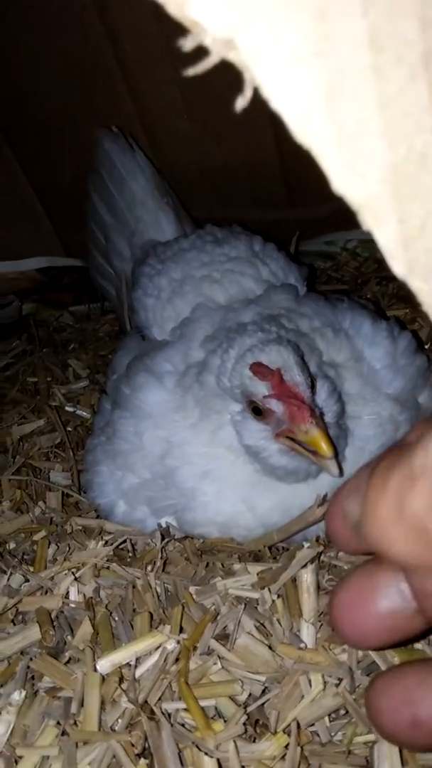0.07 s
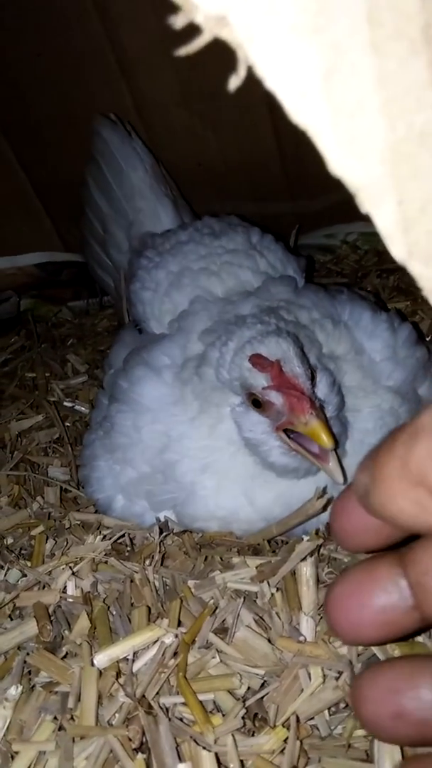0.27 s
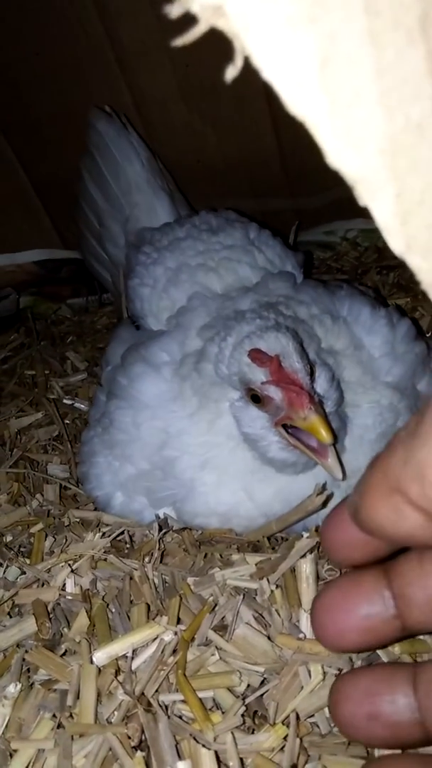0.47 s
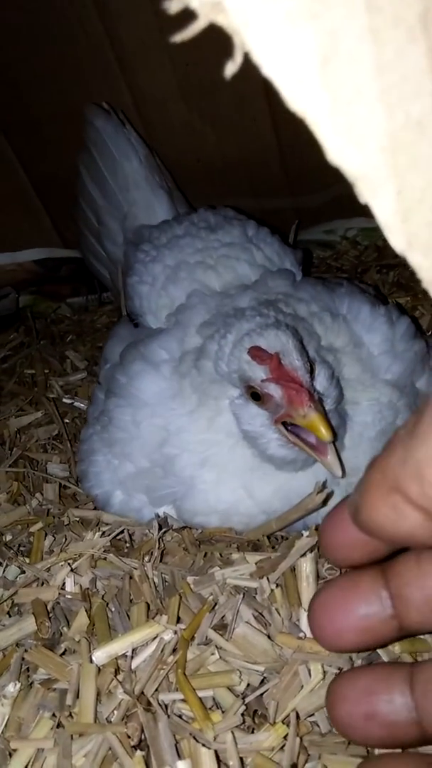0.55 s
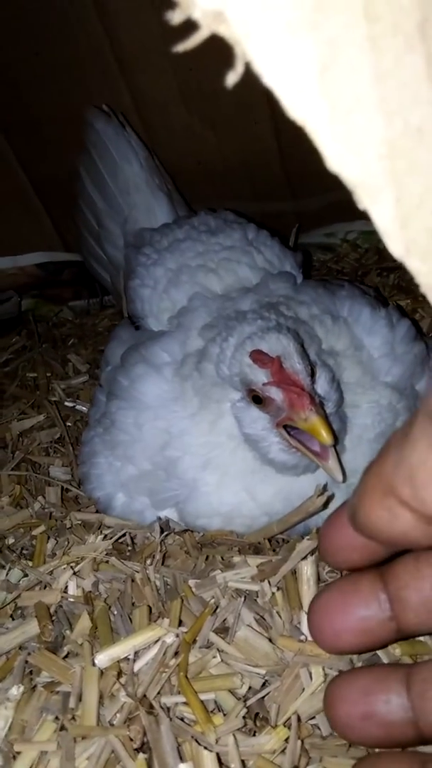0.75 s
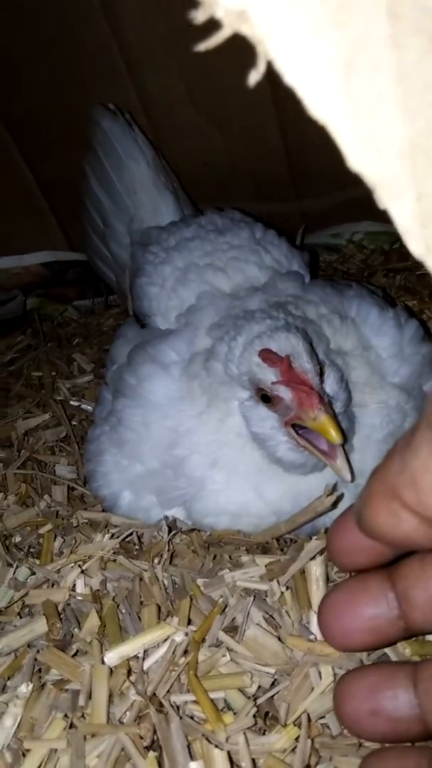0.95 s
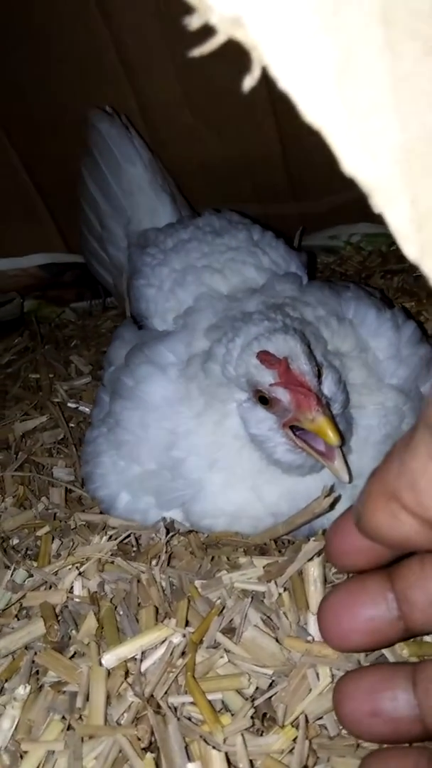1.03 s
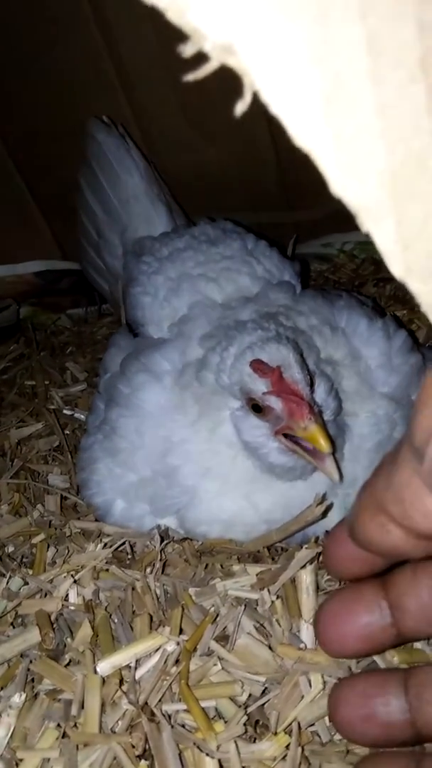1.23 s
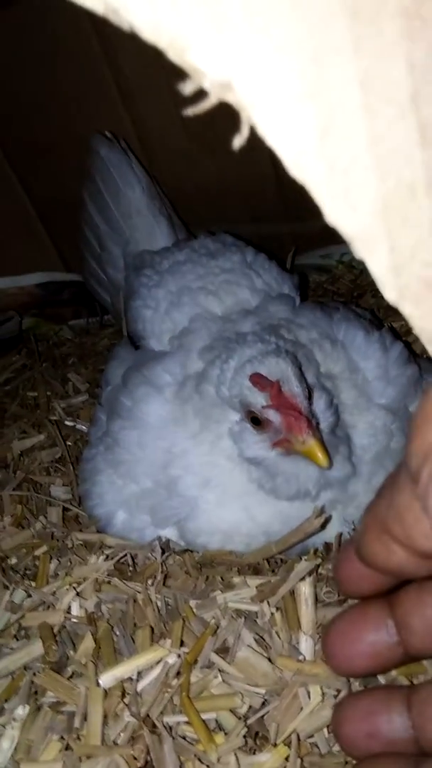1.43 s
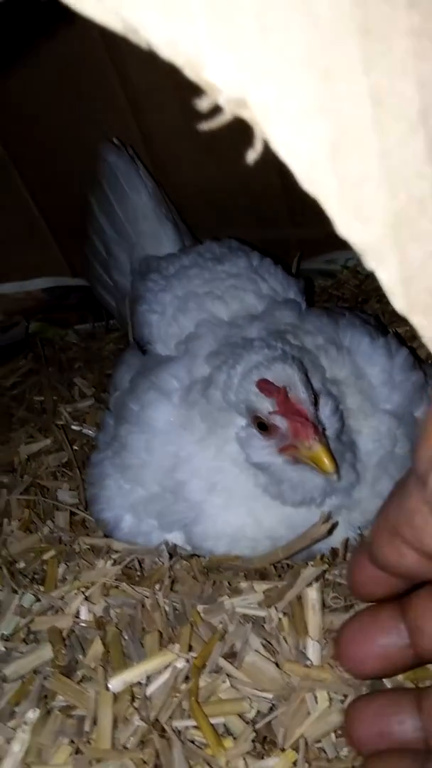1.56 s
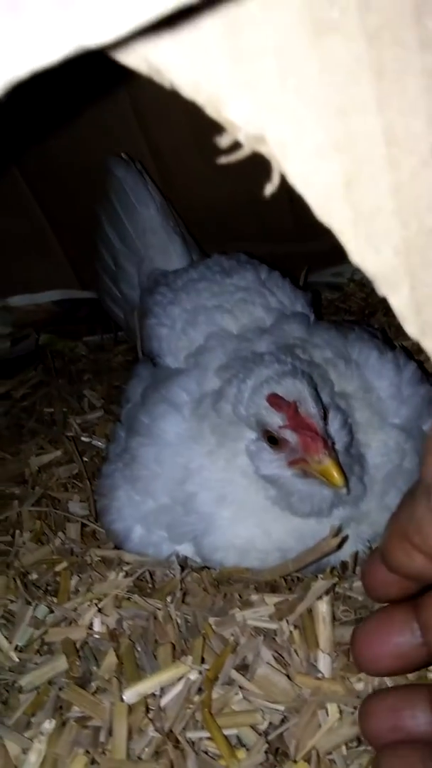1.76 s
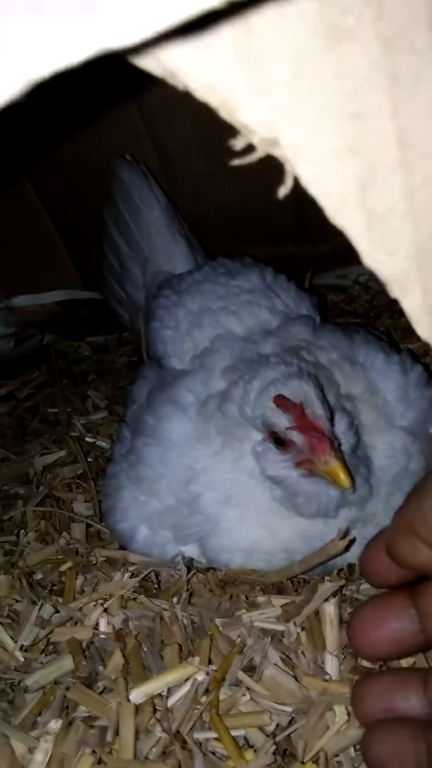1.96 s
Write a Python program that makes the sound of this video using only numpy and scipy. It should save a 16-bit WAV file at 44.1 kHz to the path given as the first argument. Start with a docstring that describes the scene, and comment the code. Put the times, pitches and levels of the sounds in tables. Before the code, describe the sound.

A broody hen gives one long harsh raspy growl, stuttering at first and dropping in pitch at the end

```python
"""A hen on a straw nest in a cardboard box gives one long warning growl, close by.
It starts as a stutter of pulses from the syrinx, over a hiss of shaped noise and a thin whistle.
The syllables fuse into a harsh rasp of uneven pulses and noise puffs, full of tiny gliding tones.
The rasp then clears and falls in pitch as the beak closes, cracking into half-order partials.
Straw stirs faintly afterwards, as crackles and thuds of filtered noise over a quiet background."""
import sys
import numpy as np
from scipy import signal
from scipy.fft import rfft, irfft
from scipy.io import wavfile

SR = 44100
rng = np.random.default_rng(int(sys.argv[2]) if len(sys.argv) > 2 else 0)


def master(y):
    """Save y as 16-bit WAV."""
    cut = np.clip(np.atleast_2d(y).T, -1, 1)
    pcm = np.round(cut * 32767)  # scale
    wavfile.write(sys.argv[1], SR, pcm.astype(np.int16))


N = 88200
T = np.arange(N) / SR  # time [s]
HZ = np.fft.rfftfreq(2 * N, 1 / SR)  # frequencies of the zero-padded spectrum [Hz]


def amp(db):
    """Level law: decibels to amplitude gain."""
    return 10 ** (np.asarray(db) / 20)


def unit(x):
    """Normalisation to an rms of 1."""
    return x / np.sqrt(np.mean(x ** 2) + 1e-20)


def curve(rows, axis=1):
    """Linear interpolation of one column of a time table at every sample."""
    rows = np.array(rows, float)
    return np.interp(T, rows[:, 0], rows[:, axis])


def at_hz(rows, hz):
    """Interpolation of a spectrum table on a log-frequency axis."""
    table_hz, value = np.transpose(rows)
    return np.interp(np.log(hz + 1), np.log(table_hz), value)


def filtered(x, gain):
    """Linear filtering: multiplication by a frequency response."""
    return irfft(rfft(x, 2 * N) * gain)[:N]


def coloured(x, rows):
    """Minimum-phase filtering: the phase follows from the log gain; output rms 1."""
    log_gain = np.log(amp(at_hz(rows, HZ)))
    circle = np.concatenate([log_gain, log_gain[-2:0:-1]])
    response = np.exp(np.conj(signal.hilbert(circle)))[:N + 1]
    return unit(filtered(x, response))


def wobble(rate_hz):
    """Low-passed random motion with a Gaussian spectrum, rms 1."""
    return unit(filtered(rng.standard_normal(N), np.exp(-(HZ / rate_hz) ** 2)))


# pitch of the voice before sag and jitter: (time [s], frequency [Hz])
PITCH = [(0, 496.7), (.18, 504.8), (.4, 550.1), (1.2, 551.8), (1.33, 517), (1.42, 497.4), (1.47, 466.9),
         (1.51, 463.3), (1.57, 420)]
# harshness of the voice: (time [s], roughness [0-1])
ROUGHNESS = [(0, .5), (.9, .72), (1.28, 0.61), (1.34, .34), (1.415, 0.3), (1.445, 0.2), (1.51, 0.24),
             (1.55, 0.42)]
# at first the membranes close twice a cycle, so odd harmonics are weak: (time [s], strength [0-1])
ODD_STRENGTH = [(0, 0), (.6, 0.25), (1.36, 0.99)]
SYLLABLE_SAG = .08  # largest fall of pitch, as a fraction
JITTER, SHIMMER, WANDER_HZ = .14, .15, 424  # pitch and log-level unsteadiness at full roughness
RASP_HZ, RASP_DB = 88.1, 1.47  # random level flutter at full roughness
PUFF_SHARE, PUFF_CYCLES, PUFF_ABOVE_HZ = 1, 1., 210  # power share at full roughness, decay, high-pass
# as the rasp clears, the squeal locks onto the fourth harmonic
LOCK_S, LOCK_LENGTH_S, LOCK_GAIN = 1.376, 0.05, 0.77


def syrinx():
    """Self-oscillation: uneven membrane pulses, each with a puff of turbulent air."""
    rough = np.clip(curve(ROUGHNESS), 0, 1)
    # the pitch sags in every syllable
    sag = SYLLABLE_SAG * opening() * np.clip(1 - (T / FUSED_S) ** 2, 0, 1)
    hz = curve(PITCH) * (1 - sag)
    turns = np.cumsum(hz * (1 + JITTER * rough * wobble(WANDER_HZ))) / SR

    orders = np.arange(1, 30)
    harmonics = np.cos(2 * np.pi * orders[:, None] * turns)
    even = unit(harmonics[1::2].sum(0))
    odd = unit(harmonics[::2].sum(0))
    pulses = (even + curve(ODD_STRENGTH) * odd) / np.hypot(1, curve(ODD_STRENGTH))
    lock_swell = np.exp(-.5 * ((T - LOCK_S) / LOCK_LENGTH_S) ** 2)
    locked = LOCK_GAIN * lock_swell * harmonics[3]
    pulses = (pulses + locked) * np.exp(SHIMMER * rough * wobble(WANDER_HZ))

    turbulence = filtered(rng.standard_normal(N), HZ / np.hypot(HZ, PUFF_ABOVE_HZ))
    puffs = np.exp(-(turns % 1) / PUFF_CYCLES) * turbulence
    share = np.clip(PUFF_SHARE * rough ** 2, 0, 1)
    strength = amp(RASP_DB * rough * wobble(RASP_HZ))
    return (np.sqrt(1 - share) * unit(pulses) + np.sqrt(share) * unit(puffs)) * strength


# opening syllables: middle [s]
SYLLABLES = [.022, .074, .126, .177, .227, .276, .319, .361, .404]
SYLLABLE_S, EDGE_S, FUSED_S = .021, 0.0098, .435  # syllable length, half-width of an edge, fusion


def opening():
    """Valve action: the syrinx opens once per syllable, then stays open (0-1)."""
    inside = np.max([SYLLABLE_S / 2 - abs(T - s) for s in SYLLABLES] + [T - FUSED_S], axis=0)
    return .5 + .5 * np.sin(np.pi / 2 * np.clip(inside / EDGE_S, -1, 1))


GAP_DB, GAP_RISE_DB_PER_S = -33, 61.5
END_S, RELEASE_S = 1.57, .07


def airflow():
    """Amplitude modulation: gaps leak more and more; the call ends in a short release."""
    leak = amp(np.minimum(GAP_DB + GAP_RISE_DB_PER_S * T, 0))
    release = np.clip(1 - (T - END_S) / RELEASE_S, 0, 1)
    return np.maximum(opening(), leak) * release


SMEAR_S, SMEAR_WIDTH_HZ = 0.001, 260  # spread of the delays, spacing in frequency


def smeared(x):
    """Dispersion: reflections off close walls delay each frequency slightly differently."""
    delays = SMEAR_S * rng.standard_normal(200)
    delay = np.interp(HZ, np.arange(len(delays)) * SMEAR_WIDTH_HZ, delays)
    # phase is the running sum of group delay
    return filtered(x, np.exp(-2j * np.pi * np.cumsum(delay) * HZ[1]))


# colour of throat, beak and nest: (frequency [Hz], relative level [dB])
THROAT = [(200, -63), (360, -42.5), (460, -29), (760, -20.5), (930, -6), (1020, -13.5), (1110, -3.5),
          (1300, -17.5), (1440, -10), (1850, -15), (2020, -8), (2150, -12), (2300, -2), (2530, 1),
          (2820, -7.5), (3000, -1), (3370, -15), (3480, -6.5), (3700, -4.5), (4050, -18), (4420, -9),
          (4580, -18.5), (4800, -8), (5000, -25), (5320, -17), (5700, -30), (6300, -33), (7800, -52),
          (9400, -51.5), (10400, -73.5), (11400, -57), (12300, -69)]
# crossovers between the four voice bands: frequency [Hz]
BAND_EDGES_HZ = [701, 2060, 3326]
# constant offset of each voice band: level [dB]
BAND_TRIM_DB = [1.5, -1.13, -2.5, -1.25]
# voice bands before their offsets:
# (time [s], fundamental level [dB], body level [dB], ring level [dB], treble level [dB])
BAND_LEVELS = [(0, -59, -31, -37, -60), (.17, -54, -30.5, -32.5, -39.5), (.32, -58, -30.5, -20.5, -34),
               (.7, -48.5, -29.5, -20, -31), (.92, -50, -25.5, -16, -22), (1.24, -48, -23.5, -16, -20),
               (1.35, -50, -28.5, -22, -22.5), (1.425, -55, -26.5, -33.5, -29),
               (1.455, -43.5, -25.5, -40, -39.5), (1.5, -41, -27, -49, -47.5),
               (1.55, -48.5, -29.5, -65, -53.5), (1.6, -55.5, -54.5, -73.5, -75.5)]


def growl():
    """Source and filter: pulses ring the throat; four bands swell and fade with the beak."""
    voice = smeared(coloured(syrinx(), THROAT))
    crossovers = [.5 - .5 * np.tanh((HZ - edge) / 70) for edge in BAND_EDGES_HZ]
    below = [0] + crossovers + [1]
    out = np.zeros(N)
    for k, trim_db in enumerate(BAND_TRIM_DB):
        band = unit(filtered(voice, below[k + 1] - below[k]))
        level_db = curve(BAND_LEVELS, axis=k + 1)
        out += band * amp(level_db + trim_db)
    return out * airflow()


# partials between the harmonics:
# (middle [s], Gaussian length [s], multiple of the pitch [1], level [dB])
CRACKS = [(1.495, 0.0048, 2.5, -26.5), (1.479, 0.0078, 3.5, -26)]


def cracks():
    """Period doubling: the membranes briefly slip to half-order partials as the call falls."""
    turns = np.cumsum(curve(PITCH)) / SR
    out = np.zeros(N)
    for s, length, multiple, level_db in CRACKS:
        swell = np.exp(-.5 * ((T - s) / length) ** 2)
        out += np.sqrt(2) * amp(level_db) * swell * np.sin(2 * np.pi * multiple * turns)
    return out


SQUEAL_S, SQUEAL_FALL_HZ_PER_S = 0.0029, 60000  # at size 1 and steepness 1
SQUEAL_HZ, SQUEAL_JITTER = 2478, .02


def squeal(waver, s, level_db, hz=SQUEAL_HZ, size=1, steepness=1):
    """Frequency modulation: a few milliseconds of unsteady tone sliding in pitch."""
    near = abs(T - s) < .02
    t, out = T[near] - s, np.zeros(N)
    turns = hz * t - steepness * SQUEAL_FALL_HZ_PER_S * t ** 2 / 2
    turns += np.cumsum(SQUEAL_JITTER * hz * waver[near]) / SR
    swell = np.exp(-.5 * (t / (size * SQUEAL_S)) ** 2)
    out[near] = np.sqrt(2) * amp(level_db) * swell * np.sin(2 * np.pi * turns)
    return out


# distinct squeals of the second sound source in the syrinx: (middle [s], level [dB])
SQUEALS = [(.216, -23), (.263, -19.5), (.276, -19.5), (.305, -20.5), (.347, -19.5), (.365, -16),
           (.384, -18), (.409, -21), (.447, -16.5), (.464, -25.5), (.533, -17)]
# crowd of squeals: mean rate, pitch range either way, level against the ring band, end
SQUEALS_PER_S, SQUEAL_SPREAD_HZ, SQUEAL_DB, SQUEALS_END_S = 80, 70, -3.5, 1.33


def squeals():
    """Second oscillator: distinct squeals, then a random flatter crowd that follows the ring."""
    gap, loud, high, size, steep = rng.random((200, 5)).T
    times = FUSED_S + np.cumsum(.5 + gap) / SQUEALS_PER_S
    ring_db = np.interp(times, T, curve(BAND_LEVELS, axis=3))
    level_db = ring_db + SQUEAL_DB + 2 * (2 * loud - 1)
    hz = SQUEAL_HZ + SQUEAL_SPREAD_HZ * (2 * high - 1)
    # slopes of either sign, so some of the crowd rise
    crowd = zip(times, level_db, hz, .5 + 1.5 * size, .5 * (steep - .5))
    rows = list(SQUEALS) + [row for row in crowd if row[0] < SQUEALS_END_S]
    waver = wobble(WANDER_HZ)
    return sum(squeal(waver, *row) for row in rows)


# thin whistle that carries on between the syllables, before sag, swell and flutter:
# (time [s], frequency [Hz], level [dB])
WHISTLE = [(0, 1974, -50.5), (.13, 1996, -49), (.25, 2088, -51), (.29, 2960, -70), (.338, 2863, -40.5),
           (.372, 2237, -32), (.43, 2305, -31), (.52, 2220, -120)]
WHISTLE_WAVER, WHISTLE_SAG = 0.027, .05  # fractions of the pitch
WHISTLE_OPEN_DB, WHISTLE_LAG_S = 16, 0.0045  # swell that follows each opening
WHISTLE_FLUTTER_DB = 6  # with the syrinx open; twice this when shut; fades until fusion
# colour of the hiss through the open beak: (frequency [Hz], relative level [dB])
HISS = [(3300, -18.5), (4400, 3.5), (6400, 0), (6650, -28), (14000, -39.5)]
# strength of the hiss: (time [s], level [dB])
HISS_LEVEL = [(0, -42), (.3, -50.5), (.7, -100)]


def wheeze():
    """Turbulence and a whistle tone: both are heard before the growl takes hold."""
    waver = 1 + WHISTLE_WAVER * wobble(rate_hz=202)
    hz = curve(WHISTLE) * (1 - WHISTLE_SAG * opening()) * waver
    turns = np.cumsum(hz) / SR
    fade = np.clip(1 - T / FUSED_S, 0, 1)
    swell_db = WHISTLE_OPEN_DB * np.interp(T - WHISTLE_LAG_S, T, opening()) * fade
    flutter_db = WHISTLE_FLUTTER_DB * (2 - opening()) * fade * wobble(RASP_HZ)
    level_db = curve(WHISTLE, axis=2) + swell_db + flutter_db
    whistle = np.sqrt(2) * np.sin(2 * np.pi * turns) * amp(level_db)
    hiss = coloured(rng.standard_normal(N), HISS) * amp(curve(HISS_LEVEL))
    return whistle + hiss


# reverberation: (frequency [Hz], 60 dB decay time [s])
ROOM_T60 = [(460, 0.61), (750, 0.24), (2000, 0.43), (5000, 0.13)]
BOX_HZ, BOX_T60_S, BOX_DB = 1407, 0.49, -17.5  # one resonance of the box, level against the tail


def room(x):
    """Reverberation: noise decays at its own speed in each band, and one box resonance rings."""
    hz, t, z = signal.stft(rng.standard_normal(SR // 2), SR, nperseg=256)
    decay = np.exp(-np.log(1000) * t / at_hz(ROOM_T60, hz)[:, None])
    tail = signal.istft(z * decay, SR, nperseg=256)[1]
    ring = np.sin(2 * np.pi * BOX_HZ * T) * np.exp(-np.log(1000) * T / BOX_T60_S)
    ring = ring[:len(tail)]
    response = tail / np.linalg.norm(tail) + amp(BOX_DB) * ring / np.linalg.norm(ring)
    return signal.fftconvolve(x, response)[:N]


# stirrings in the straw, levels before the envelope:
# (start [s], decay constant [s], crackle level [dB], thud level [dB])
STIRS = [(1.739, 0.051, -57.5, -50), (1.867, 0.1, -63.5, -67.5)]
# colour of the crackles: (frequency [Hz], relative level [dB])
STRAW = [(300, 0), (2450, 10.5), (3300, -2.5), (5500, -4), (14000, -29)]
# colour of the thud: (frequency [Hz], relative level [dB])
THUD = [(30, -15), (120, 4), (700, -47)]
CRACKLES_PER_S, STIR_RISE_S = 4400, 0.013


def straw():
    """Random impulses: soft crackles and a dull noise thud each time the bedding shifts."""
    impulses = rng.standard_normal(N) * (rng.random(N) < CRACKLES_PER_S / SR)
    crackle = coloured(impulses, STRAW)
    thud = coloured(rng.standard_normal(N), THUD)
    out = np.zeros(N)
    for s, length, crackle_db, thud_db in STIRS:
        envelope = np.clip((T - s) / STIR_RISE_S, 0, 1) * np.exp(-abs(T - s) / length)
        out += envelope * (amp(crackle_db) * crackle + amp(thud_db) * thud)
    return out


# colour of the quiet background: (frequency [Hz], relative level [dB])
FLOOR = [(40, -20), (68, 2), (260, -15.5), (2000, -30.5), (14000, -50.5)]
FLOOR_DB = -63


def background():
    """Stationary noise: a steady, quiet floor with a shaped spectrum."""
    return amp(FLOOR_DB) * coloured(rng.standard_normal(N), FLOOR)


ROOM_DB = -16.5


def scene():
    """Superposition: the hen, her reverberation, the straw and the background add."""
    hen = growl() + cracks() + squeals() + wheeze()
    return (hen + amp(ROOM_DB) * room(hen) + straw() + background())[None]


CUTOFF_HZ = 14200


def record(dry):
    """Band limiting: a linear-phase low-pass filter removes the highest treble."""
    lowpass = signal.firwin(511, CUTOFF_HZ, window=("kaiser", 9), fs=SR)
    return signal.oaconvolve(dry, lowpass[None], "same")


dry = scene()
out = record(dry)
master(out)
```